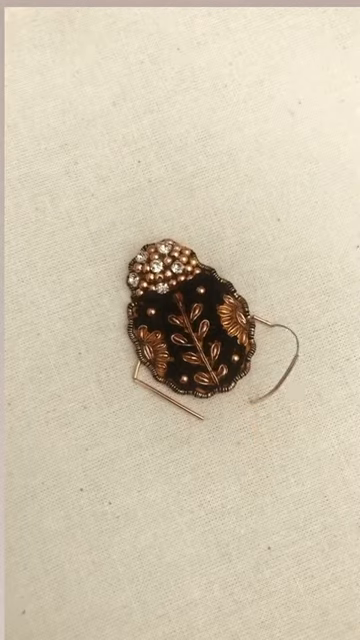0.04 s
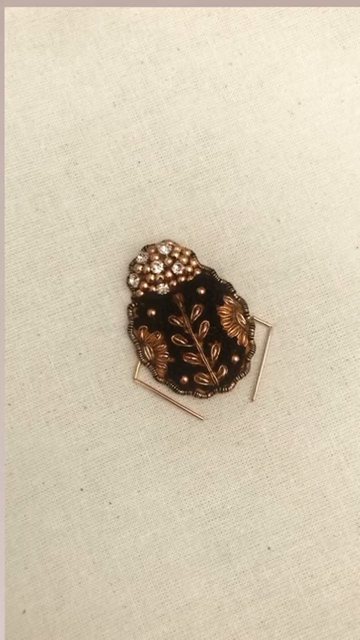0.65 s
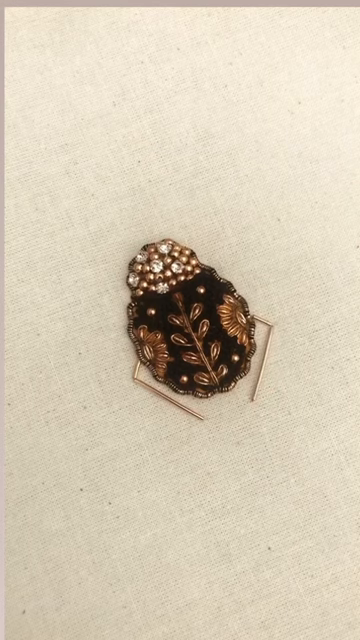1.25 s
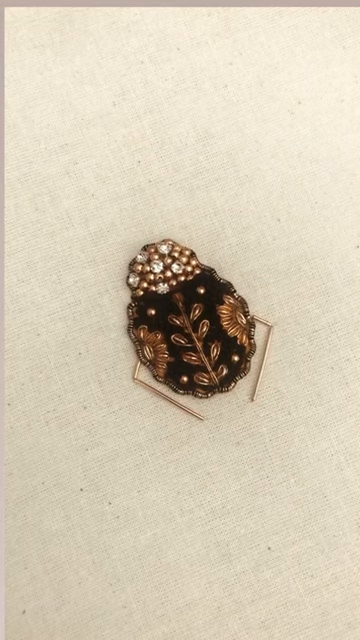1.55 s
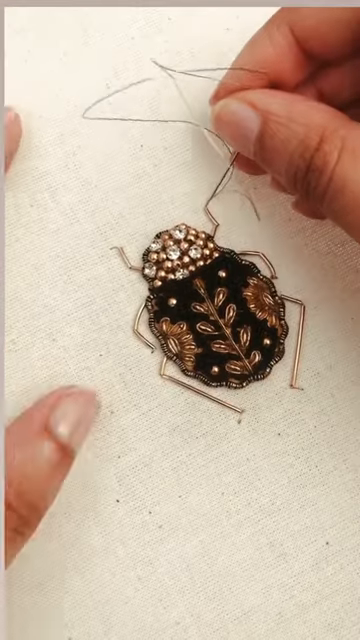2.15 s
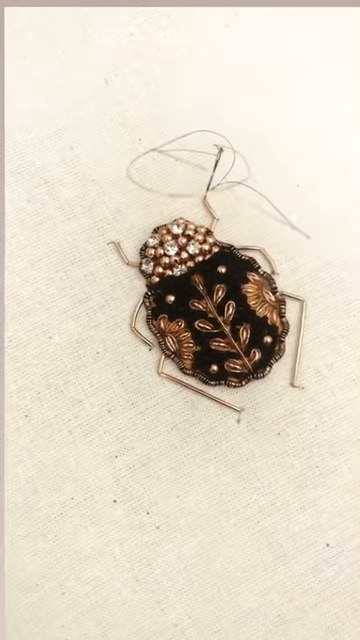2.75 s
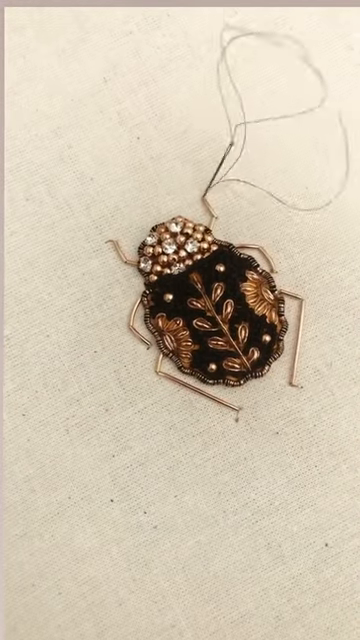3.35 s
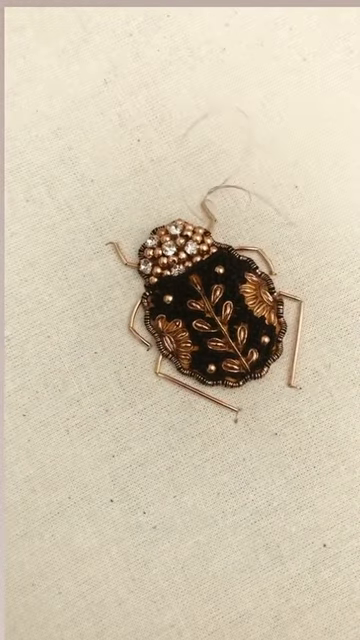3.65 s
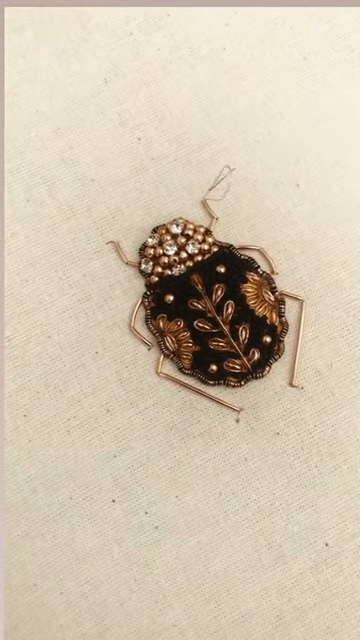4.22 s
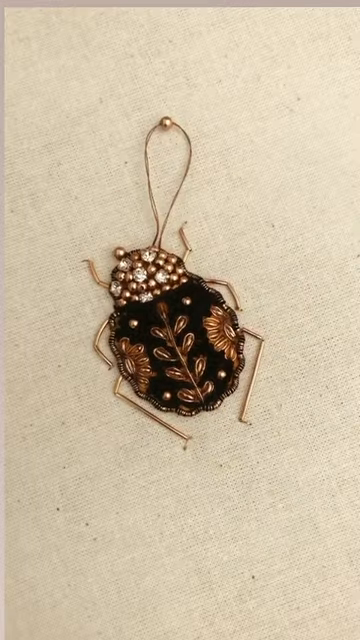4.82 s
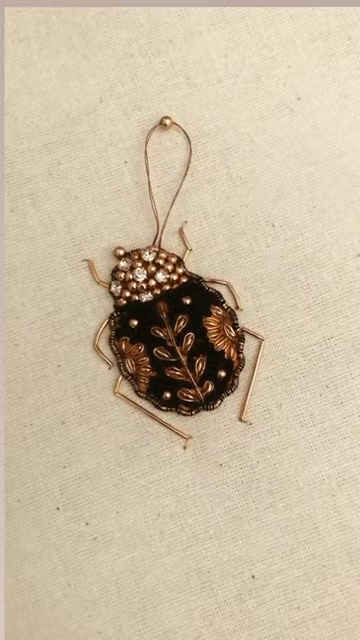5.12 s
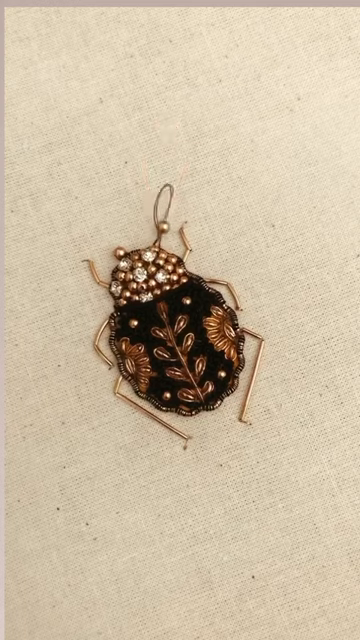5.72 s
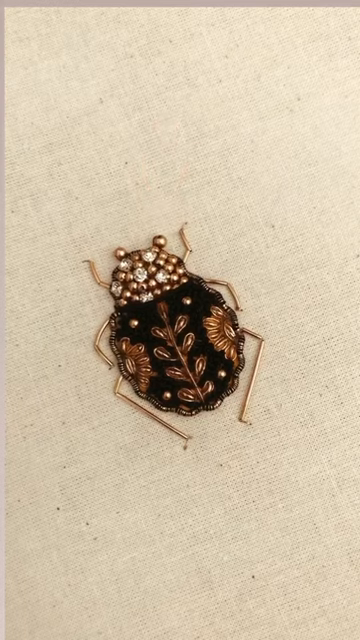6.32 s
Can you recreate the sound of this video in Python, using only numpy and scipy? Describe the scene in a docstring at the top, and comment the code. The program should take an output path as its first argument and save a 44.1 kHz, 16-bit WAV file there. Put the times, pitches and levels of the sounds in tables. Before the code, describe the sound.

A needle pops softly through taut cloth and thread swishes after it, with dull hand rubs in a quiet room.

```python
"""Hand embroidery in a quiet room

Close by, a needle pops through cloth stretched in a frame and makes it ring like a small drum.
Thread swishes after it through the weave, rasping and squeaking faintly as it tightens.
Hands rub and sway the frame, and a bead ticks near the end. The sound drops out once, briefly."""
import sys
import numpy as np
from scipy import signal
from scipy.fft import rfft, irfft, next_fast_len
from scipy.io import wavfile

SR = 44100
rng = np.random.default_rng(int(sys.argv[2]) if len(sys.argv) > 2 else 0)


def materialize(psi):
    """Save the field psi as 16-bit PCM at rate SR to the path in sys.argv[1].

    A 1-D psi becomes a single channel; in a 2-D psi each row is a channel.
    """
    bounded = np.clip(np.atleast_2d(psi).T, -1, 1)
    quanta = np.round(bounded * 32767).astype(np.int16)
    wavfile.write(sys.argv[1], SR, quanta)


N = 289737


# Fibres snapping past the needle. Each row: start in seconds, level in dB, then how much
# louder or softer the cloth's ring, the needle's ring and its tip's ping are, in dB.
SNAPS = [(2.6359, -37.5, 5.5, -7, -11), (2.638, -47, 3, 7, -11), (2.6835, -43, 8, -16, -25),
         (2.6932, -43.5, -8, -8, -18), (3.819, -40.5, -4, -11, -11), (3.8256, -26.5, -4, -2.5, 5),
         (3.8278, -37, -24.5, 1, 3.5), (3.8306, -36, -8.5, -9, -11), (3.834, -50.5, -2.5, -10, -15.5),
         (4.123, -39.5, 1, -9, -3)]
# Soft plucks. Each row: start in seconds, level in dB, pitch in Hz, ring length (1 is free cloth).
PLUCKS = [(1.904, -54.5, 290, 1.1), (2.538, -49, 520, 1.2), (2.553, -51.5, 760, 1),
          (2.573, -47.5, 504, 0.96), (2.600, -53, 604, 0.56), (2.612, -60, 600, 0.71),
          (2.618, -41, 486, 1.8), (2.626, -40, 477, 0.7), (2.656, -44, 480, 0.8), (2.694, -36.5, 472, 0.6),
          (3.567, -52, 677, 0.62), (3.613, -52, 645, 0.45), (3.821, -38.5, 760, 1.3),
          (3.824, -37.5, 509, 1.6), (3.8356, -23.5, 397, 0.35), (3.875, -54, 600, 0.72),
          (3.894, -51, 500, 1.2), (4.104, -55, 656, .7), (4.1346, -38.5, 524, 0.24), (4.191, -48, 503, 2.1),
          (4.305, -39, 403, 0.32), (4.357, -49.5, 640, .6), (4.447, -41.5, 282, 1.35),
          (4.536, -44.5, 338, 0.7), (4.57, -47.5, 324, 1.7), (4.672, -49, 455, 0.26), (4.726, -44, 367, .4),
          (4.759, -43.5, 317, 0.75), (5.595, -52.5, 315, 1.8), (6.196, -48, 313, 1.46),
          (6.507, -47, 288, 2), (6.531, -52, 244, 1.5), (6.553, -52, 300, 1.4)]
# How cloth, needle and tip ring in a snap. Each row: pitch in Hz, width in Hz, level in dB.
SNAP_RINGS = [(1350, 420, 17), (1550, 460, 10), (2120, 270, 10.5), (2366, 290, 13), (2800, 190, 4.5)]
NEEDLE_RINGS = [(5480, 1750, 12), (6630, 540, 4), (9330, 2400, -15.5), (12260, 1400, 1)]
TIP_RINGS = [(14830, 420, 6.5)]
CLOTH_HZ = 445

def needle(snap_db, pluck_db, after_db):
    """Fibres snap past the needle and pluck the cloth, which rings on faintly with the frame."""
    out = np.zeros(N)
    for s, db, ring_db, bright_db, ping_db in SNAPS:
        jolt = fibre_snap()
        steel = undb(bright_db) * resonate(jolt, NEEDLE_RINGS)
        ping = undb(ping_db) * resonate(jolt, TIP_RINGS)
        add(out, s, resonate(jolt, SNAP_RINGS) + steel + ping, db + snap_db)
        add(out, s, cloth_ring(CLOTH_HZ, push_s=0.00034), db + ring_db)
    for s, db, hz, length in PLUCKS:
        add(out, s, cloth_ring(hz, push_s=0.0027, length=length), db + pluck_db)
    return out + undb(after_db) * resonate(out, LINGERING_RINGS)


def fibre_snap():
    """A fibre lets go: one clean jolt, a brief crumble of smaller ones and a faint tail."""
    burst = .3 * crack(decay_s=.0009, tail_db=-20, tail_s=.018)
    burst[0] = 2.5  # the clean jolt
    return dull(burst, top_hz=11400)


# The taut cloth's tones. Each row: multiple of the pitch, seconds to fade by 60 dB, level in dB.
CLOTH_TONES = [(0.68, 0.013, 11.5), (0.994, 0.038, 7), (1.17, .03, -19), (1.581, 0.038, -14)]

def cloth_ring(hz, push_s, length=1):
    """The taut cloth rings briefly like a drum skin; a finger resting on it shortens the ring."""
    t = np.arange(SR // 8) / SR
    ring = sum(undb(db - 60 * t / (fade_s * length)) * np.sin(2 * np.pi * hz * ratio * t)
               for ratio, fade_s, db in CLOTH_TONES)
    return ring * (1 - np.exp(-t / push_s))


# Low thuds of the cloth. Each row: start in seconds, level in dB, pitch in Hz.
THUDS = [(0.858, -39, 71), (0.928, -44, 102), (2.546, -43.5, 193), (2.569, -40, 111), (2.647, -29, 104),
         (2.689, -44, 184), (2.702, -28.5, 86), (3.827, -32, 107.6), (3.845, -24.5, 43), (4.13, -34, 66),
         (4.717, -34, 48.6)]

def cloth_rebound(thud_db, swell_s):
    """Let go by the needle, the whole cloth springs back with a short, low swing."""
    out, t = np.zeros(N), np.arange(SR // 3) / SR
    for s, db, hz in THUDS:
        add(out, s, t * np.exp(-t / swell_s) * np.sin(2 * np.pi * hz * t), db + thud_db)
    return out


# Pulls of the thread. Each row: fastest moment, rise and fall in seconds, then the levels of
# hiss, drag on the cloth and scrape in dB.
PULLS = [(.27, 0.21, 0.12, -78, -60.5, -85), (1.09, 0.38, .28, -66, -67, -99),
         (1.2, 0.16, 0.26, -70, -71, -78), (2.97, 0.3, 0.13, -77.5, -71, -74.5),
         (3.2, 0.26, 0.45, -77.5, -69, -76), (4.0, 0.066, 0.072, -88, -60.5, -82),
         (4.2, 0.049, 0.075, -74, -54, -80), (4.32, 0.15, 0.19, -75.5, -56, -75.5),
         (4.43, 0.08, 0.087, -80, -52.5, -89), (4.68, 0.32, 0.27, -96, -57, -76.5),
         (5.07, 0.12, 0.52, -72.5, -88, -85), (5.61, 0.068, 0.1, -75, -77, -96),
         (5.74, 0.12, 0.19, -81, -70, -99), (6.25, 0.087, 0.088, -80, -74, -89)]
# Needle pushes. Each row: strongest moment in seconds, then hiss, drag and frame jolt in dB.
PUSHES = [(2.558, -75, -50, -51), (2.637, -71.5, -52, -47), (2.70, -70, -59, -47),
          (3.832, -64, -44.5, -38.5), (4.124, -68.5, -47, -42)]
# The tone of the hiss and of the drag. Each row: frequency in Hz, level in dB.
HISS_COLOUR = [(300, -1), (1100, 11), (2000, 4), (3600, 4.5), (4300, 3.5), (4900, -2), (5600, 4),
               (7000, 0.5), (9700, -1), (10400, -8), (11800, -3.5), (13500, -25), (15500, -17)]
DRAG_COLOUR = [(120, -12.5), (300, 9.5), (750, -1.5), (1000, -4), (2000, -5.5), (9000, -32)]
# How cloth and frame ring on, and how the scrape rings. Each row: pitch in Hz, width in Hz, level in dB.
LINGERING_RINGS = [(209.3, 31, 6), (292.5, 23, -1), (345, 20, -2.5), (395.6, 40, -3.5), (477.6, 38, -3.5),
                   (585.5, 13, 3.5), (671, 16, -4.5), (776, 13, -1), (869, 12, -4.5)]
SCRAPE_RINGS = [(1280, 340, 7), (1970, 330, 4), (2530, 150, -2.5), (3150, 470, -25)]
SLACK_HISS_DB, SLACK_DRAG_DB = -82.5, -80.5

def thread(slide_db, drag_db, scrape_db):
    """Fine slips hiss; coarser slips of the tight thread ring the cloth and scrape the needle."""
    hiss = colour(friction(per_second=3000, spread_db=-0.5, smooth=0.93), HISS_COLOUR)
    coarse_slips = friction(per_second=490, spread_db=3.0, smooth=0.86)
    drag = colour(resonate(coarse_slips, LINGERING_RINGS), DRAG_COLOUR)
    scrape = unit(resonate(friction(per_second=560, spread_db=2.0, smooth=1.0), SCRAPE_RINGS))
    pulls = [(swell(s, rise, fall), levels) for s, rise, fall, *levels in PULLS]
    moves = pulls + [(press(s), levels) for s, *levels in PUSHES]
    sliding = together([(shape, db) for shape, (db, _, _) in moves], SLACK_HISS_DB)
    dragging = together([(shape, db) for shape, (_, db, _) in moves], SLACK_DRAG_DB)
    scraping = together([(shape, db) for shape, (_, _, db) in pulls])
    return (undb(slide_db) * hiss * sliding
            + undb(drag_db) * drag * dragging
            + undb(scrape_db) * dull(scrape, top_hz=5000) * scraping)


# A hand leaning on the frame. Each row: strongest moment, rise and fall in seconds, level in dB,
# pitch in Hz.
LEANS = [(.3, .35, 0.45, -46, 40.34), (2.47, 1, 0.14, -43.5, 46.7), (2.9, 0.29, 0.37, -45.5, 53.72),
         (3.41, 0.042, 0.18, -39, 42), (3.69, 0.19, 0.15, -38.5, 57.86), (4.45, 0.21, 0.33, -46, 44),
         (6.53, 0.22, 0.32, -44.5, 32)]
# The tone of the frame's swinging. Each row: frequency in Hz, level in dB.
SWAY_COLOUR = [(12, -26.5), (26, 0.5), (39, 0), (47, -3.5), (56, -4), (66, -5), (80, -14), (140, -27.5),
               (300, -79.5)]
RECOIL_DB, RESTING_SWAY_DB = 2.5, -51

def frame_sway(sway_db, width_hz):
    """The frame rumbles as a hand leans on it, and swings just after each needle push."""
    leans = sum(undb(db) * swell(s, rise, fall) * waver(hz, width_hz) for s, rise, fall, db, hz in LEANS)
    recoils = [(swell(s + 0.029, rise_s=0.11, fall_s=0.26), db + RECOIL_DB) for s, _, _, db in PUSHES]
    motion = colour(rng.standard_normal(N), SWAY_COLOUR)
    evened = motion / np.sqrt(np.abs(signal.hilbert(motion)))  # makes the swings more alike in size
    swing = colour(evened, [(75, 2.5), (150, -19.5), (600, -70.0)])
    return undb(sway_db) * (leans + swing * together(recoils, RESTING_SWAY_DB))


# Finger rubs. Each row: start and length in seconds, level in dB, the frame's pitch and width in Hz.
RUBS = [(0.04, 0.27, -52, 152.6, 22), (0.301, .17, -52.5, 135, 37), (0.82, 0.21, -51, 121, 85),
        (1.08, 0.2, -58, 130, 110), (1.299, 0.544, -67.5, 260, 65), (2.94, 0.75, -60, 107.4, 58),
        (4.28, 0.56, -51.5, 111, 41), (5.626, 0.88, -53.5, 104, 13.6), (5.683, .14, -65, 315, 70),
        (6.129, 0.07, -56, 108, 21), (6.385, 0.066, -52, 105, 16), (6.494, 0.068, -56, 210, 100)]
# The tone of rubbing skin. Each row: frequency in Hz, level in dB.
SKIN_COLOUR = [(50, -24.5), (90, 7), (200, -9.5), (300, -4.5), (800, -26.5)]
RESTING_GRIP_HZ, RESTING_RUB_DB = 111.5, -65
JOLT_LAG_S = 0.026  # the frame gives a moment after the needle

def finger_rubs(hands_db, grip_width_hz):
    """Fingers rub dully on the frame; each grip makes it hum at its own pitch."""
    skin = colour(friction(per_second=200, spread_db=-2.5, smooth=0.88), SKIN_COLOUR)
    jolts = together([(press(s + JOLT_LAG_S), db) for s, _, _, db in PUSHES], RESTING_RUB_DB)
    rubs = unit(resonate(skin, [(RESTING_GRIP_HZ, grip_width_hz, 0)])) * jolts
    for s, length, db, hz, width in RUBS:
        finger = np.roll(skin, rng.integers(N))
        rubs += undb(db) * unit(resonate(finger, [(hz, width, 0)])) * stroke(s, length)
    return undb(hands_db) * rubs


# Squeaks. Each row: start and length in seconds, first pitch, last pitch and width in Hz, level in dB.
SQUEAKS = [(0.217, 0.096, 681, 694, 33, -71), (1.781, 0.1, 1034, 960, 180, -78),
           (1.951, 0.057, 660, 750, 75, -70.5), (2.691, 0.027, 480, 396, 62, -53),
           (4.618, 0.25, 397.6, 351, 20, -64.5), (5.066, 0.05, 452, 458, 7.5, -70),
           (6.12, 0.05, 956, 1033, 130, -71), (6.232, 0.075, 659, 657, 15, -70.5)]

def thread_squeaks(squeak_db):
    """The stretched thread sings faintly as it rubs; its pitch follows how tight it is."""
    out, t = np.zeros(N), np.arange(N) / SR
    for s, length, start_hz, end_hz, width_hz, db in SQUEAKS:
        pitch = np.interp(t, [s, s + length], [start_hz, end_hz])
        out += undb(db + squeak_db) * waver(pitch, width_hz) * stroke(s, length)
    return out


# Needle scratches. Each row: strongest moment, rise and fall in seconds, level in dB.
SCRATCHES = [(2.56, 0.045, 0.039, -73), (2.632, 0.056, .035, -72), (3.40, 0.048, 0.045, -77.5),
             (3.799, .06, .02, -74), (3.822, 0.014, .025, -65), (3.87, .04, 0.13, -76),
             (4.16, .07, .09, -79)]
# Their tone. Each row: frequency in Hz, level in dB.
SCRATCH_COLOUR = [(1500, -27.5), (4500, -4.5), (6200, 4.5), (9400, -4), (10500, -8.5), (12200, 2),
                  (13300, -19), (15500, -24.5)]

def needle_scratches(scratch_db):
    """The side of the needle grates through the weave in bright, gritty slips."""
    grit = colour(friction(per_second=900, spread_db=2.0, smooth=0.7), SCRATCH_COLOUR)
    moves = [(swell(s, rise, fall), db) for s, rise, fall, db in SCRATCHES]
    return undb(scratch_db) * grit * together(moves)


# Grinds of the needle's point. Each row: strongest moment and length in seconds, level in dB.
GRINDS = [(2.54, .014, -64), (2.555, .012, -62), (2.565, .010, -61), (2.608, .008, -63), (2.642, .012, -66),
          (2.699, 0.019, -56), (4.103, 0.0049, -55), (4.298, 0.034, -70), (4.437, .03, -63)]
# How they ring. Each row: pitch in Hz, width in Hz, level in dB.
GRIND_RINGS = [(1234, 420, 7), (1480, 300, -9.5)]

def point_grinding(grind_db):
    """The point grinds between the threads in a few short, coarse slips."""
    slips = friction(per_second=1100, spread_db=-4.0, smooth=0.8)
    grind = unit(resonate_twice(slips, GRIND_RINGS))
    moves = [(swell(s, length / 2, length / 2), db) for s, length, db in GRINDS]
    return undb(grind_db) * grind * together(moves)


# Tugs on the thread. Each row: strongest moment, rise and fall in seconds, level in dB.
TUGS = [(4.19, .08, .06, -76), (4.31, .05, .07, -78), (4.425, 0.073, 0.089, -70), (4.67, .14, .16, -77)]
# How the rasp rings. Each row: pitch in Hz, width in Hz, level in dB.
RASP_RINGS = [(2560, 430, 0)]

def thread_tightening(rasp_db):
    """Pulled taut, the thread slips through its hole with a thin rasp on each tug."""
    slips = friction(per_second=450, spread_db=6.0, smooth=0.6)
    rasp = unit(resonate_twice(slips, RASP_RINGS))
    return undb(rasp_db) * rasp * together([(swell(s, rise, fall), db) for s, rise, fall, db in TUGS])


# Needle and bead ticks. Each row: start in seconds, level in dB, pitch in Hz, fade time in seconds.
TICKS = [(4.219, -59.5, 4270, 0.0042), (4.358, -62, 10900, 0.001)]
# A bead touching its neighbours. Each row: start in seconds, level in dB.
BEAD_TOUCHES = [(6.507, -53), (6.5155, -51.5), (6.54, -57), (6.552, -51)]
# How a bead rings. Each row: pitch in Hz, width in Hz, level in dB.
BEAD_RINGS = [(3000, 340, 0), (3880, 540, 2), (10000, 590, -2.5)]

def beads(bead_db, tick_width):
    """Needle and beads tick lightly; the last bead settles against its neighbours."""
    out = np.zeros(N)
    for s, db, hz, decay_s in TICKS:
        tick = crack(decay_s, tail_db=-15, tail_s=0.027)
        add(out, s, resonate_twice(tick, [(hz, hz * tick_width, 0)]), db)
    for s, db in BEAD_TOUCHES:
        touch = crack(decay_s=0.0021, tail_db=-16, tail_s=0.023)
        add(out, s, resonate_twice(touch, BEAD_RINGS), db + bead_db)
    return out


# The tone of the room's steady noise and of a soft rush. Each row: frequency in Hz, level in dB.
ROOM_COLOUR = [(20, -6), (35, -5.5), (58, -1), (85, -24), (115, -32), (175, -28), (240, -23.5),
               (310, -28.5), (500, -34), (1050, -38), (1900, -41.5), (4300, -46), (4900, -48.5),
               (5600, -48), (9500, -53), (15500, -65.5)]
RUSH_COLOUR = [(300, -18), (650, -1), (800, -3.5), (1080, 0.5), (1600, -13.5), (3000, -36.5), (6000, -40.5)]
ROOM_DB = -53.5
RUSH_START_DB, RUSH_FADE_DB_PER_S, RUSH_REST_DB, FLUTTER_DB = -69.5, 3.5, -81, 1.95
WHINE_HZ, WHINE_DB, WHINE_WANDER_DB = 8500, -93.5, 3

def room():
    """Steady room noise, a soft rush that flutters and fades, and a faint whine that comes and goes."""
    steady = undb(ROOM_DB) * colour(rng.standard_normal(N), ROOM_COLOUR)
    fading = np.maximum(RUSH_START_DB - RUSH_FADE_DB_PER_S * np.arange(N) / SR, RUSH_REST_DB)
    flutter = FLUTTER_DB * wander(rate_hz=7.2)
    rush = undb(fading + flutter) * colour(rng.standard_normal(N), RUSH_COLOUR)
    whine_gain = undb(WHINE_DB + WHINE_WANDER_DB * wander(rate_hz=2.2))
    whine = unit(resonate(rng.standard_normal(N), [(WHINE_HZ, 30, 0)]))
    return steady + rush + whine_gain * whine


def friction(per_second, spread_db, smooth):
    """Fibres catch and let go: tiny random slips of uneven size over a smooth rub."""
    caught = rng.random(N) < per_second / SR
    sizes = undb(spread_db * np.minimum(rng.exponential(size=N), 3))
    return unit(caught * sizes * rng.choice([-1, 1], N)) + smooth * rng.standard_normal(N)


def crack(decay_s, tail_db, tail_s):
    """A sharp burst with a faint tail from the surfaces nearby."""
    t = np.arange(SR // 4) / SR
    return rng.standard_normal(len(t)) * (np.exp(-t / decay_s) + undb(tail_db) * np.exp(-t / tail_s))


def waver(hz, width_hz):
    """Uneven rubbing keeps a tone going; more width makes it waver faster."""
    smooth = signal.butter(2, np.clip(width_hz / 2, 1, 500), fs=SR, output="sos")
    a, b = signal.sosfilt(smooth, rng.standard_normal((2, N)))
    wobble = (a + 1j * b) / np.sqrt(np.hypot(a, b) + 1e-18)
    tone = np.exp(2j * np.pi * np.cumsum(hz * np.ones(N)) / SR)
    return unit((wobble * tone).real)


def wander(rate_hz):
    """A slow random rise and fall."""
    return colour(rng.standard_normal(N), [(rate_hz, 0), (3 * rate_hz, -60), (9 * rate_hz, -140)])


def swell(s, rise_s, fall_s):
    """A smooth hand movement: from rest up to 1 at time s and back to rest."""
    t = np.arange(N) / SR - s
    moving, out = (t > -rise_s) & (t < fall_s), np.zeros(N)
    out[moving] = np.cos(np.pi / 2 * t[moving] / np.where(t[moving] < 0, rise_s, fall_s)) ** 2
    return out


def press(s, rise_s=0.021, fall_s=0.059):
    """The force of a needle push builds up to time s, then the weave relaxes."""
    t = np.arange(N) / SR - s
    return np.exp(-np.abs(t) / np.where(t < 0, rise_s, fall_s))


def stroke(s, length_s, rise_s=0.0095, fall_s=0.019):
    """A rub starts quickly, holds and dies away."""
    t = np.arange(N) / SR - s
    return np.clip(t / rise_s, 0, 1) * np.exp(-np.maximum(t - length_s, 0) / fall_s)


def together(moves, rest_db=-np.inf):
    """Join movements (shape, dB) and a resting level into one loudness curve; their powers add."""
    return np.sqrt(undb(rest_db) ** 2 + sum((undb(db) * shape) ** 2 for shape, db in moves))


def colour(x, points):
    """Shape a sound's tone along (Hz, dB) points, at a standard strength."""
    hz, db = np.transpose(points)
    size = next_fast_len(N)
    bins = np.maximum(np.fft.rfftfreq(size, 1 / SR), 1)
    gain = undb(np.interp(np.log(bins), np.log(hz), db))
    return unit(irfft(rfft(x, size) * gain, size)[:N])


def resonate(x, rings):
    """Make a sound ring at each (pitch, width, dB); a narrower width rings longer."""
    return sum(undb(db) * signal.lfilter(*signal.iirpeak(min(hz, SR / 2 - 1), hz / width, fs=SR), x)
               for hz, width, db in rings)


def resonate_twice(x, rings):
    """Two passes make the pitches stand out more."""
    return resonate(resonate(x, rings), rings)


def dull(x, top_hz):
    """Soft fibres round off the highest treble."""
    return signal.sosfilt(signal.butter(3, min(top_hz, .45 * SR), fs=SR, output="sos"), x)


def add(track, s, sound, db):
    """Mix a sound in at time s with the given peak level."""
    start = int(s * SR)
    part = sound[:N - start]
    track[start:start + len(part)] += undb(db) * part / np.abs(sound).max()


def undb(db):
    """Turn decibels into a multiplier."""
    return 10 ** (np.asarray(db) / 20)


def unit(x):
    """Scale to a standard strength (rms 1)."""
    return x / np.sqrt(np.mean(x ** 2))


def scene():
    """All the sounds mixed into one channel."""
    swish = thread(slide_db=1.5, drag_db=-2.5, scrape_db=2.5)
    hands = frame_sway(sway_db=1.0, width_hz=16) + finger_rubs(hands_db=-2.0, grip_width_hz=69)
    catching = thread_squeaks(squeak_db=-1.5) + needle_scratches(scratch_db=-0.5)
    catching += point_grinding(grind_db=-5.0) + thread_tightening(rasp_db=-1.5)
    pops = needle(snap_db=-1.5, pluck_db=-1.5, after_db=-16) + cloth_rebound(thud_db=0.5, swell_s=0.0074)
    ticks = beads(bead_db=-6.5, tick_width=0.27)
    return (swish + hands + catching + pops + ticks + room())[None]


SILENT_FROM_S, SILENT_UNTIL_S, RETURN_CLICK_DB = 4.890, 5.0503, -44
TOP_HZ = 15550

def record(dry):
    """The sound drops out for a moment and returns with a faint click; the highest treble is cut."""
    t = np.arange(N) / SR
    fade = np.clip((SILENT_FROM_S - t) / .003, 0, 1)
    sound = dry * np.where(t > SILENT_UNTIL_S, 1, fade)
    add(sound[0], SILENT_UNTIL_S, np.exp(-t / 0.003), RETURN_CLICK_DB)
    return signal.sosfilt(signal.ellip(10, .2, 70, TOP_HZ, fs=SR, output="sos"), sound)


dry = scene()
out = record(dry)
materialize(out)
```